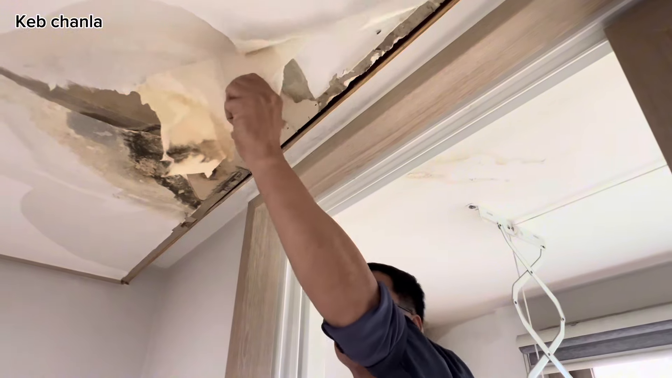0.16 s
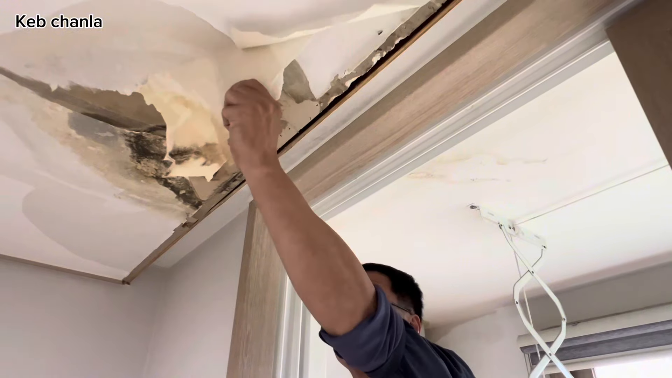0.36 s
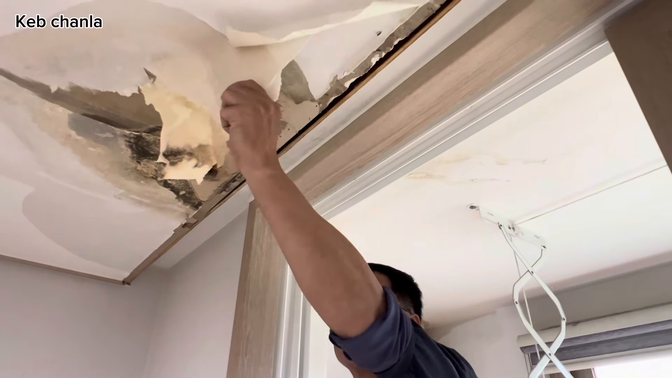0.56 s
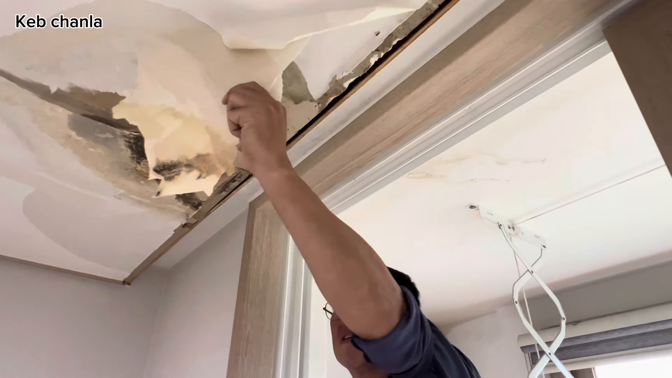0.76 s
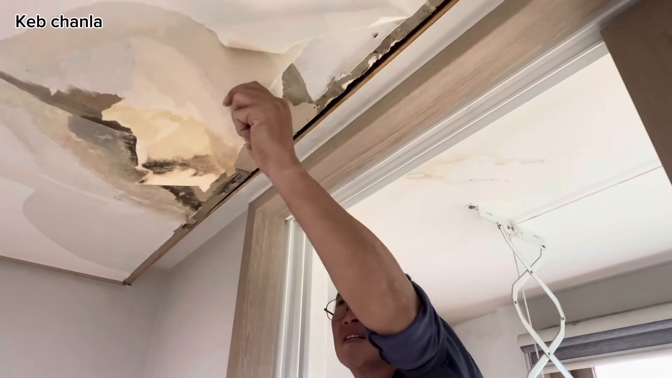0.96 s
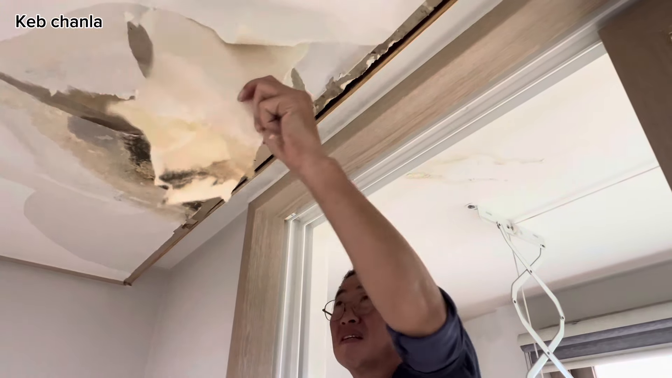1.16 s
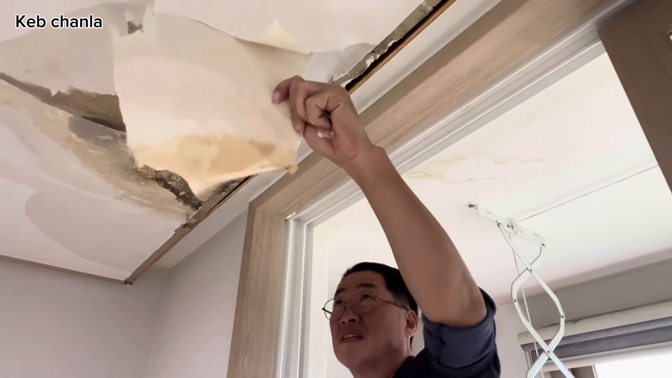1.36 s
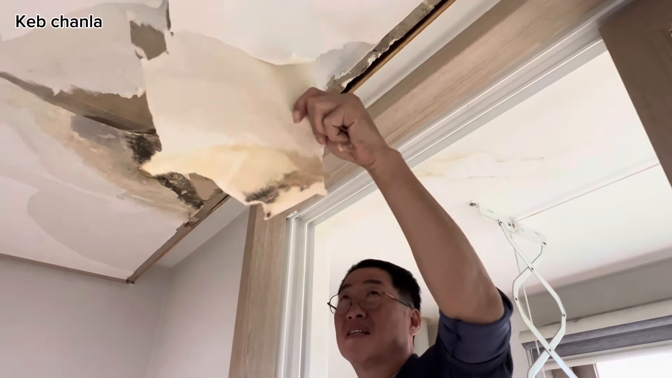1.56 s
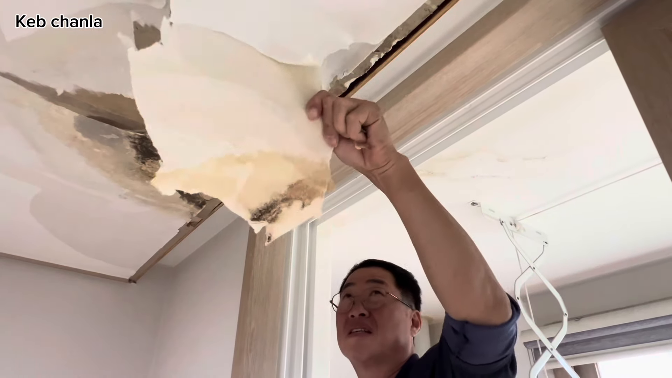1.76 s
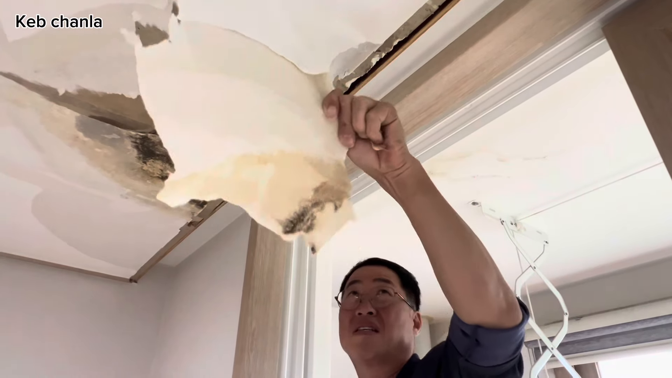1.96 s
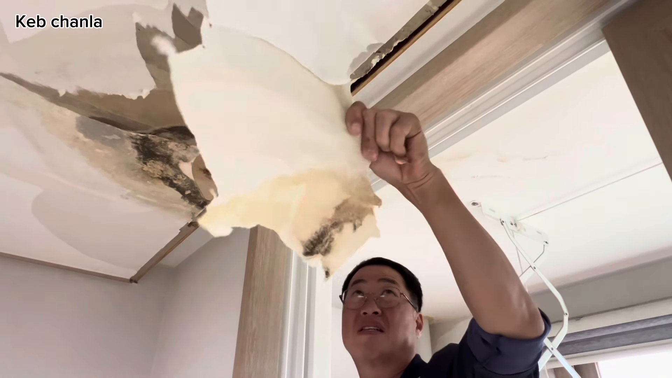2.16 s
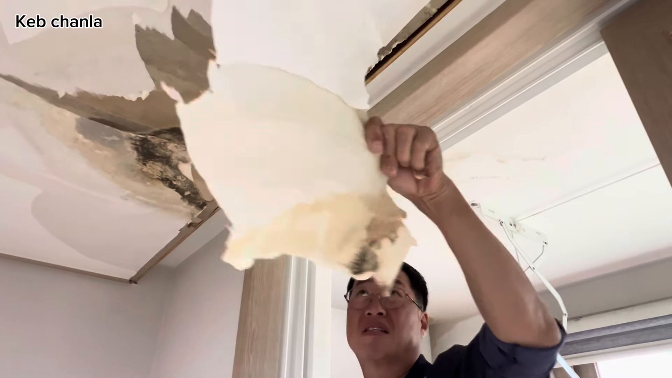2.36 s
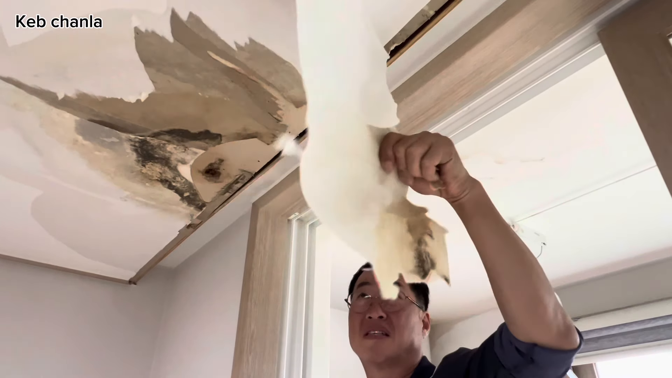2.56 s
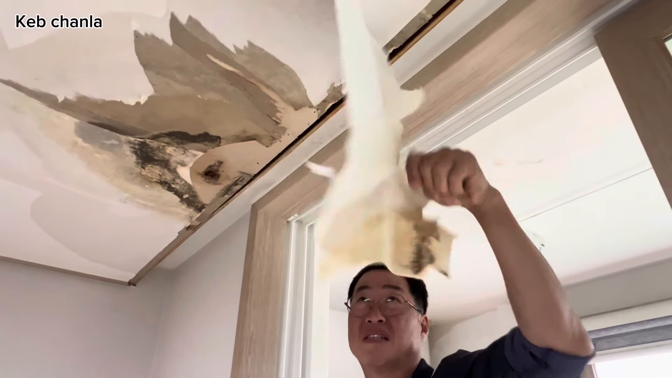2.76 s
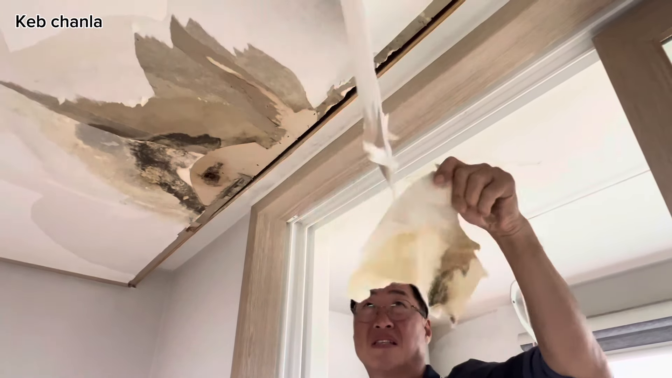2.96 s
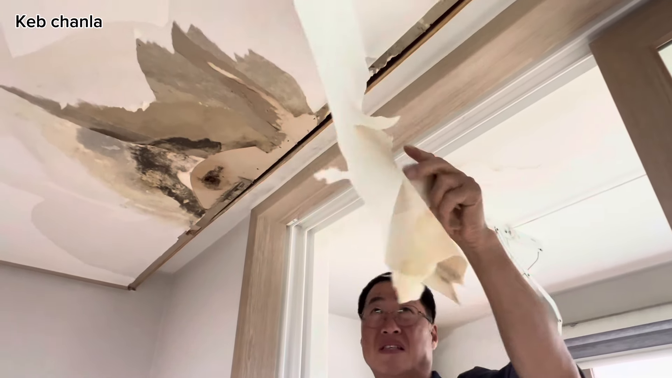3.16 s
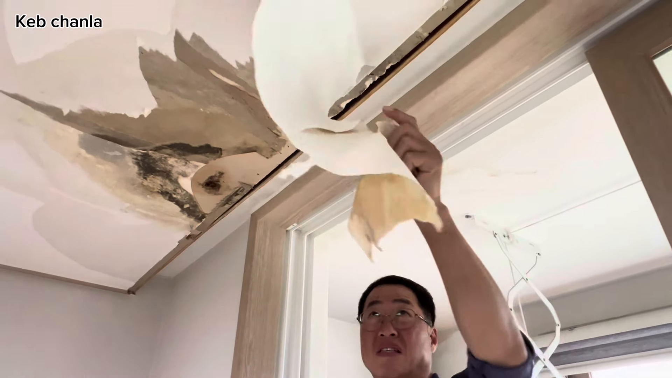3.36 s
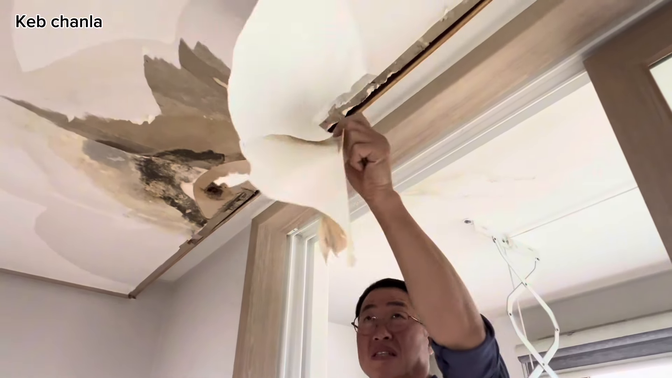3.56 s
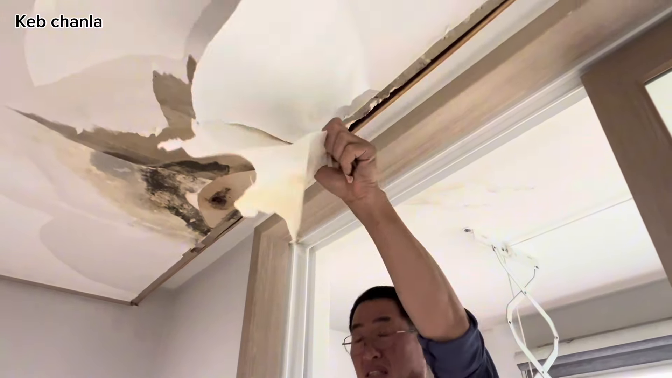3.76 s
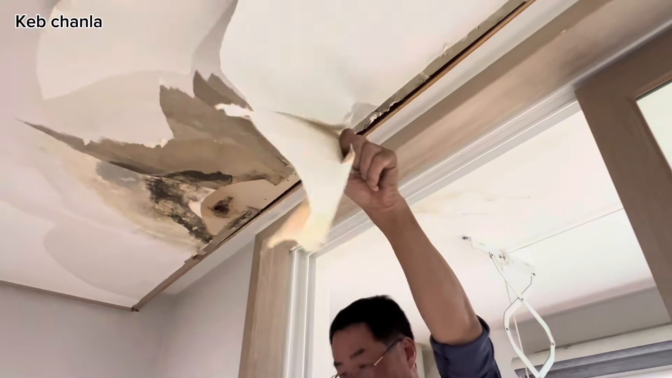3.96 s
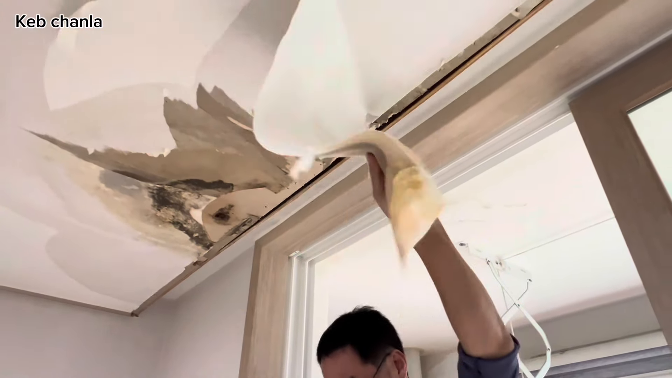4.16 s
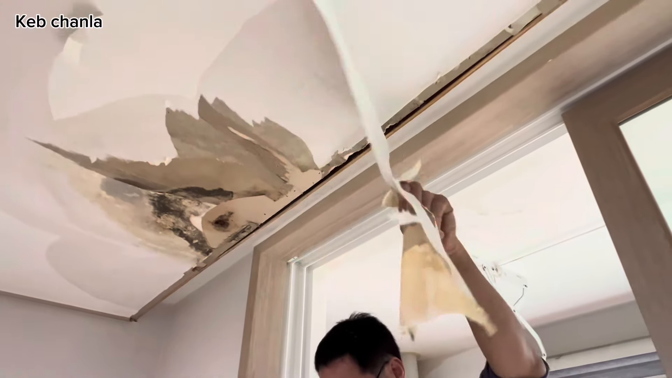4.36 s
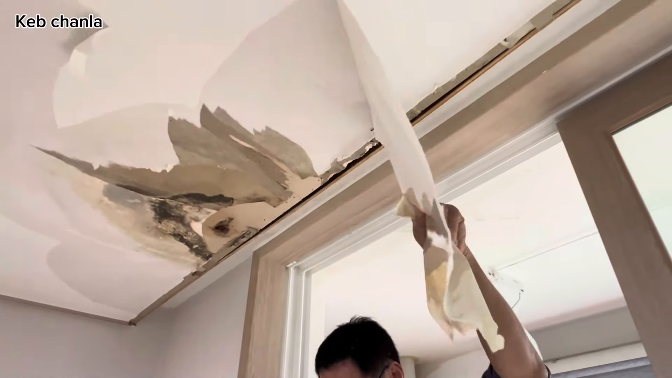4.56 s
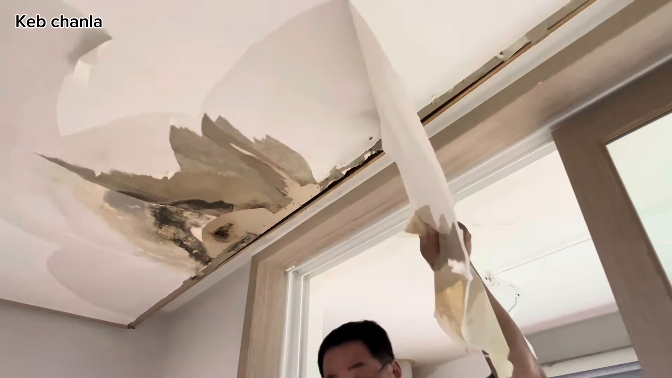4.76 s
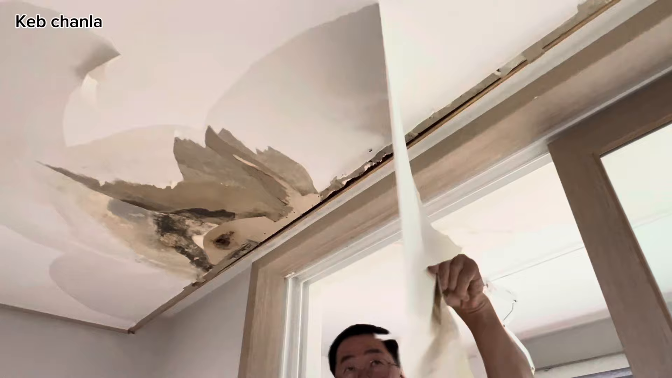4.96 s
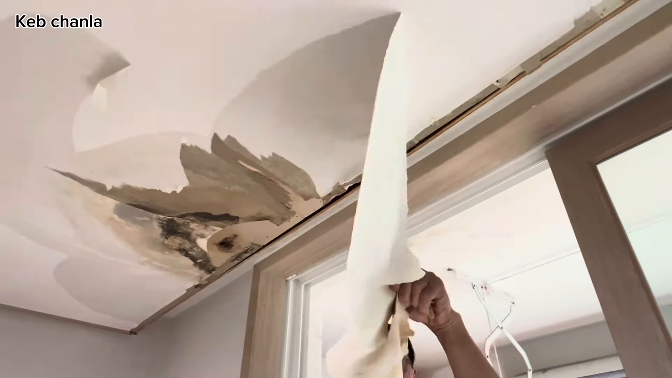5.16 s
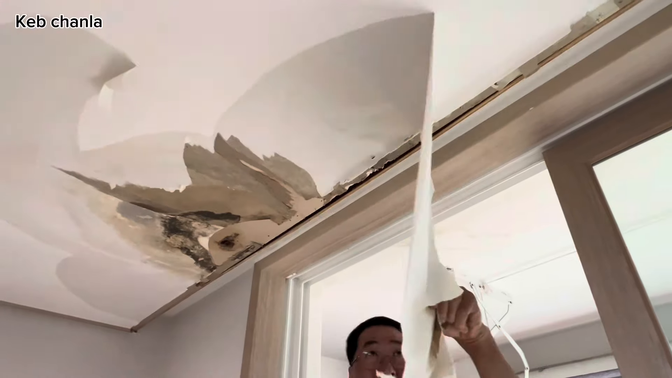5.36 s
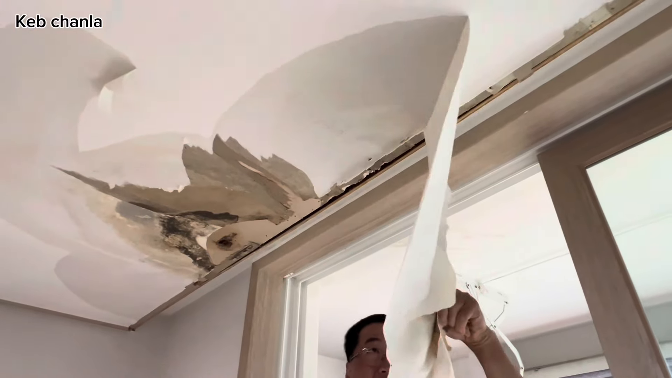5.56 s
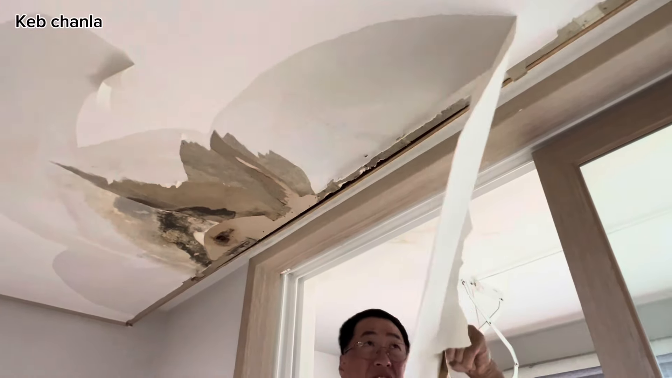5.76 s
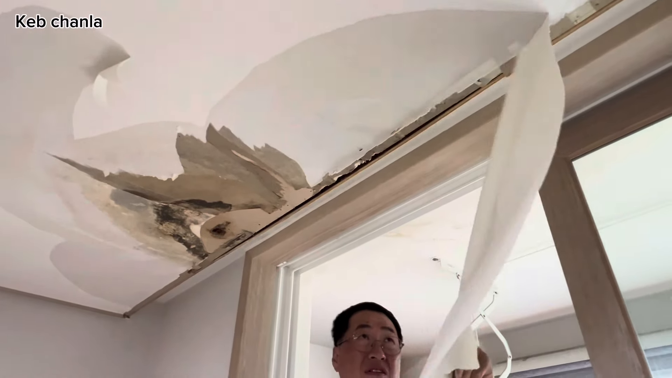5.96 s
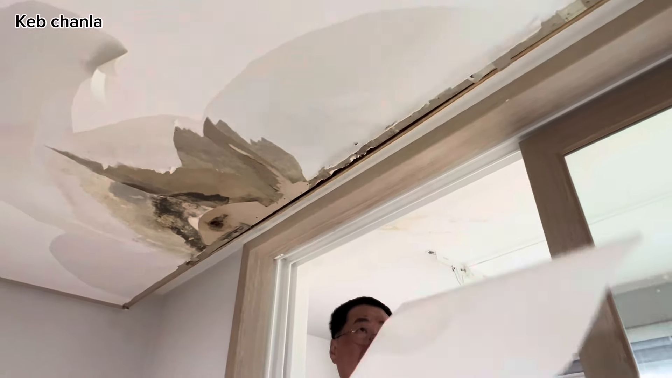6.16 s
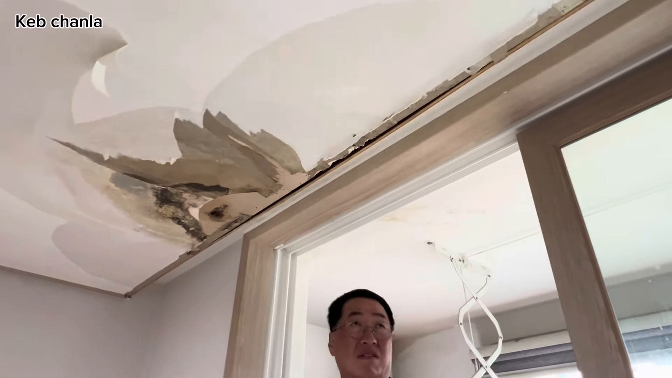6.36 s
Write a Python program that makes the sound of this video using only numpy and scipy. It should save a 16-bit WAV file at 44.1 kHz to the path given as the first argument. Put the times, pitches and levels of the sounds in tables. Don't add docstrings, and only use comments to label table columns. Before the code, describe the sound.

Close stereo pickup in a small bare room with a faint low hush. Wet paper peels overhead in several fibrous, gritty tugs, strongest around one second and between two and three. The loose sheet rattles quietly during a grip change, then a crisp crack begins a continued tearing pull, getting brighter and louder until the sheet comes free, flops with soft clacks, and quiet returns.

```python
import sys
import numpy as np
from scipy import signal
from scipy.fft import rfft, irfft
from scipy.io import wavfile
from scipy.ndimage import uniform_filter1d, map_coordinates

SR = 44100
rng = np.random.default_rng(int(sys.argv[2]) if len(sys.argv) > 2 else 0)


def generate_wav(signal):
    frames = np.transpose(np.atleast_2d(signal))
    scaled = np.clip(frames, -1, 1) * 32767
    pcm = np.round(scaled).astype(np.int16)
    wavfile.write(sys.argv[1], SR, pcm)


def convert_level_to_amplitude(level_db):
    exponent = np.asarray(level_db, float) / 20
    return 10 ** exponent


N = 286385
T = np.arange(N) / SR
HZ = np.fft.rfftfreq(N, 1 / SR)


def evened(x):
    return x / np.sqrt(np.mean(x ** 2) + 1e-20)


def read(points, hz):
    f, value = np.transpose(points)
    return np.interp(np.log(hz + 1), np.log(f + 1), value)


def over_time(points):
    s, *columns = np.transpose(points)
    return [np.interp(T, s, column) for column in columns]


def band(x, lo_hz, hi_hz, colour):
    edges = 1 / (1 + (lo_hz / (HZ + 1)) ** 12) / (1 + (HZ / hi_hz) ** 12)
    gain = convert_level_to_amplitude(read(colour, HZ)) * np.sqrt(edges)
    return evened(irfft(rfft(x) * gain, N))


def resonate(x, hz, width_hz):
    turn = np.exp(2j * np.pi * np.cumsum(hz * np.ones(len(x))) / SR)
    r = np.exp(-np.pi * width_hz / SR)
    smooth = signal.lfilter([1 - r], [1, -r], x / turn + 1e-18)
    return 2 * (turn * smooth).real


def steady(x, seconds):
    power = abs(uniform_filter1d(x ** 2, int(seconds * SR)))
    return x / np.sqrt(power + 0.12)


def lagged(power, seconds):
    r = np.exp(-1 / (SR * max(seconds, 1e-3)))
    return np.sqrt(abs(signal.lfilter([(1 - r) ** 2], [1, -2 * r, r ** 2], power)))


def add(mix, s, sound):
    part = mix[round(s * SR):][:len(sound)]
    part += sound[:len(part)]


# frequency in Hz, level in dB.
HUSH_SPECTRUM = [(18, -31.5), (30, -2), (82, 7.5), (128, -33), (187, -2), (593, -20.5), (978, -10.5),
                 (10600, -36), (12000, -58), (15600, -73), (22000, -120)]


def hush():
    left, right, shared = rng.standard_normal((3, N))
    same = np.clip(160 / (HZ + 1), 0, 1)
    z = rfft(np.array([left, right])) * np.sqrt(1 - same ** 2) + rfft(shared) * same
    swell_db = 0.71 * evened(uniform_filter1d(uniform_filter1d(shared, 3000), 3000))
    return convert_level_to_amplitude(-62.5 + swell_db) * evened(irfft(z * convert_level_to_amplitude(read(HUSH_SPECTRUM, HZ)), N))


# peak in
# s, # rise in s, fall in s, fibre hiss in dB, load on the board in dB against the hiss.
FIRST_RIPS = [(0.06, 0.2, 0.057, -48.5, -2), (0.37, 0.21, 0.018, -40, -9.5),
              (0.456, 0.066, 0.037, -38.5, -12), (0.64, 0.2, 0.16, -37.5, -4.5),
              (0.722, 0.03, 0.29, -46.5, -3.5), (0.982, 0.14, 0.18, -34.5, -4),
              (1.052, 0.07, 0.064, -27, -7.5), (1.177, 0.12, 0.076, -33, 0.5),
              (1.422, 0.085, 0.2, -36, -5.5), (1.523, 0.093, 0.058, -32.0, -4.5),
              (1.764, 0.036, 0.035, -50, -1), (1.984, 0.13, 0.022, -34.5, 1.5),
              (2.048, 0.1, 0.042, -38.5, 2), (2.277, 0.089, 0.141, -30.5, -19),
              (2.316, 0.025, 0.13, -28, -11.0), (2.49, 0.66, 0.069, -34.5, -4),
              (2.594, 0.2, 0.176, -36, -15.5), (2.735, 0.11, 0.038, -30, -2.5)]
HANDLING = [(2.948, 0.062, 0.026, -61.5, 16.5), (3.059, 0.024, 0.11, -55, -15),
            (3.282, .042, 0.084, -58.5, -17), (3.453, 0.027, 0.054, -50.5, -10.5),
            (3.56, 0.024, .03, -72, 10), (3.66, 0.053, 0.09, -57, -10), (3.79, .03, .04, -70, 9.5),
            (3.916, 0.094, 0.033, -56, -4), (4.061, 0.046, 0.0091, -48, -13),
            (4.137, 0.093, 0.031, -51.5, -15), (6.0, 0.025, 0.033, -54, 7.5),
            (6.052, 0.017, 0.016, -50.5, -2), (6.119, .04, 0.048, -64, 10.5), (6.381, .093, 0.071, -73, 8),
            (6.49, 0.035, .04, -72, 0)]
LATER_RIPS = [(4.298, 0.029, 0.046, -38.5, -4.5), (4.42, 0.078, 0.19, -37.5, -6),
              (4.718, 0.063, 0.07, -34.5, -16), (4.76, 0.14, 0.217, -33.5, -1),
              (5.021, 0.079, 0.149, -37, 0.5), (5.19, 0.12, 0.057, -35, -10), (5.304, 0.12, 0.036, -31, -3.5),
              (5.42, 0.088, 0.015, -31.5, -4.5), (5.57, 0.069, 0.022, -28.5, -12),
              (5.67, 0.41, 0.18, -29.5, -6.5), (5.722, 0.083, 0.085, -31.5, -14.5),
              (5.89, 0.037, 0.09, -34.5, -16.5), (5.94, 0.037, 0.0077, -27, -11)]


def tugs():
    tearing, load = np.zeros((2, N))
    for s, rise_s, fall_s, db, load_db in FIRST_RIPS + HANDLING + LATER_RIPS:
        side_s = np.maximum(np.where(T < s, rise_s, fall_s), .01)
        bell = convert_level_to_amplitude(2 * db) * np.exp(-2 * ((T - s) / side_s) ** 2)
        tearing += bell
        load += convert_level_to_amplitude(2 * load_db) * bell
    return tearing, load


def fibres(per_s, spread_db, clump_db, patchy_db):
    clumps = evened(uniform_filter1d(rng.standard_normal(N), 300))
    size_db = spread_db * np.minimum(rng.exponential(1, N), 3.6) + clump_db * clumps
    happens = rng.random(N) < per_s / SR
    drive = convert_level_to_amplitude(size_db) * rng.choice([-1., 1.], N) * happens
    z = signal.stft(drive, nperseg=512, noverlap=384)[2]
    patches = uniform_filter1d(rng.standard_normal(z.shape), 6, 0)
    patches = evened(uniform_filter1d(patches, 22, 1))
    return evened(signal.istft(z * convert_level_to_amplitude(patchy_db * patches), nperseg=512, noverlap=384)[1][:N])


# frequency in Hz, level in dB per Hz.
PAPER = [(18, -39.5), (30, -28.5), (63, 5.5), (97, 4.5), (145, 0.5), (180, -7), (376, -16.5), (445, -20.5),
         (490, -21), (1210, -13), (1400, -16), (4190, -13), (9000, -15), (11700, -57), (19800, -120)]
# frequency in Hz, level in dB per Hz.
AIR = [(9000, -8), (9700, -5), (10400, 0.5), (11200, 1.5), (12000, 4), (13000, -4), (14000, -0.5),
       (16000, 1)]
# time in s, finest fibres in dB against the hiss.
FINENESS = [(0, -4), (.9, -8), (2.2, -8), (2.8, -10.5), (3.3, -4.5), (3.55, -18), (3.95, -25), (4.05, -4),
            (5.3, -5), (5.9, -6), (6.1, -18)]
# time in s, slack in dB against the hiss,
# resonance of the gap behind the front in Hz.
SHEET = [(0, -6, 5230), (.45, -7, 5200), (.95, -7, 4330), (1.07, -4.5, 4300), (1.5, -4, 4370),
         (1.781, 1, 4800), (2.05, -3.5, 4400), (2.5, -12, 4550), (2.74, -3, 3880), (3.06, -8.5, 4300),
         (3.6, 2.5, 3870), (4.1, -2, 3770), (4.45, -12, 4020), (4.75, -12, 3970), (5.051, -5, 4970),
         (5.3, -10, 5300), (5.7, -3, 5830), (6.1, -2, 4700)]
BOARD_LAG_S, FLAP_LAG_S, RATTLE_LAG_S = .03, .015, .0027
FLAP_DB, FLAP_PER_SLACK, RATTLE_DB, BOARD_DB = -3.0, 0.61, -3.5, 1
FLAP_FROM_LOAD = 0.45


def peel():
    tearing, load = tugs()
    slack_db, gap_hz = over_time(SHEET)
    air_db, = over_time(FINENESS)
    drive = fibres(per_s=7000, spread_db=3.83, clump_db=1.52, patchy_db=1.7)

    gap = drive + .5 * resonate(drive, gap_hz, 1700)
    hiss = convert_level_to_amplitude(-3.0) * band(gap, 2200, 9000, PAPER)
    air = convert_level_to_amplitude(air_db) * band(drive, 6270, 14700, AIR)

    flap_power = tearing ** (1 - FLAP_FROM_LOAD) * load ** FLAP_FROM_LOAD
    flap_power = flap_power * convert_level_to_amplitude(2 * (FLAP_DB + FLAP_PER_SLACK * slack_db))
    flap = lagged(flap_power, FLAP_LAG_S) * steady(band(drive, 190, 643, PAPER), 0.085)

    rattle_power = tearing * convert_level_to_amplitude(2 * (RATTLE_DB + slack_db))
    rattle = lagged(rattle_power, RATTLE_LAG_S) * band(drive, 528, 1954, PAPER)

    board = lagged(load, BOARD_LAG_S) * steady(band(drive, 30, 188, PAPER), 0.075)
    return convert_level_to_amplitude(-4.0) * (np.sqrt(tearing) * (hiss + air) + flap + rattle + convert_level_to_amplitude(BOARD_DB) * board)


# start in s, length in s, start in Hz, end in Hz, level in dB.
CREASES = [(0.907, 0.075, 4300, 4260, -40), (1, 0.039, 1090, 1030, -40.5), (1.165, 0.046, 4200, 3920, -36),
           (1.942, 0.047, 1070, 1080, -43), (2.269, 0.15, 4830, 5340, -42),
           (2.696, 0.093, 1530, 1780, -39.5), (4.03, 0.021, 3850, 3950, -57.5),
           (4.671, 0.16, 3630, 3900, -44.5), (5.499, 0.1, 6200, 6030, -47), (5.671, 0.14, 2670, 2530, -42),
           (5.66, 0.11, 387, 373, -41), (5.67, 0.12, 255, 265, -38), (5.82, 0.097, 2650, 2470, -44),
           (5.923, 0.03, 6000, 5630, -36.5)]
CREASE_WIDTH, WIDEN_PER_KHZ = 0.057, .03


def creases():
    out = np.zeros(N)
    for s, length_s, start_hz, end_hz, db in CREASES:
        u = np.linspace(0, 1, int(length_s * SR) + 1)
        hz = start_hz + (end_hz - start_hz) * u
        width_hz = (CREASE_WIDTH + WIDEN_PER_KHZ * start_hz / 1000) * start_hz + 40
        noise = rng.standard_normal(SR // 3)[:len(u)]
        ring = resonate(resonate(noise, hz, width_hz), hz, width_hz)
        ring = evened(steady(evened(ring), .025))
        add(out, s, convert_level_to_amplitude(db) * ring * signal.windows.tukey(len(u), .6))
    return out


# start in s, body in dB, body in Hz, decay in cycles, sharp tick in dB.
SNAPS = [(3.427, -45, 1600, 1.3, -50), (2.693, -26, 900, 1.3, -34), (3.552, -38, 1200, 1.2, -43),
         (3.5525, -41, 8400, 3.5, -44), (3.644, -42, 380, .9, -56), (3.778, -44, 520, 1., -62),
         (3.812, -45, 600, 1., -62), (3.974, -31, 950, 1.6, -58), (3.98, -39, 650, 1.4, -60),
         (3.989, -41, 1100, 1.5, -60), (3.999, -43, 800, 1.5, -62), (4.262, -41, 900, .9, -42),
         (4.3905, -24, 3600, 2.5, -26), (4.398, -27, 6300, 3, -26), (4.39, -25, 6200, 4.5, -19),
         (4.391, -29, 1100, 1.5, -25), (5.831, -26, 1220, 1.3, -30), (6.051, -28, 900, 1.3, -44),
         (6.051, -29, 3600, 1.4, -46), (6.053, -29, 1600, 1.8, -50), (6.058, -36, 2300, 1.5, -52),
         (6.069, -31, 1100, 1.3, -50), (6.288, -50, 420, 1.1, -72)]


def snaps():
    out, t = np.zeros(N), np.arange(600) / SR
    for s, db, hz, cycles, tick_db in SNAPS:
        swing = np.sin(2 * np.pi * hz * t) * np.tanh(t * hz * 4.2)
        body = convert_level_to_amplitude(db) * swing * np.exp(-t * hz / max(cycles, .3))
        tick = convert_level_to_amplitude(tick_db) * rng.standard_normal(len(t)) * np.exp(-t / .0004)
        add(out, s, body + tick)
    return out


# frequency in Hz, t60 in s.
WALLS = [(80, 0.21), (300, 0.21), (1500, 0.29), (5000, 0.17), (12000, 0.12)]
# frequency in Hz, level in dB.
WET = [(60, -21.5), (200, -8.5), (600, -1.5), (2500, 0.5), (7000, -1), (9500, -6), (15000, -8)]
# delay in s, level in dB.
ECHOES = [(.0022, -7.5), (.0085, -3), (0.015, -25), (.027, -3)]


def tail():
    taps = np.zeros((2, SR // 2))
    at = np.arange(300, SR // 2 - 20, 20) + rng.integers(0, 20, (2, (SR // 2 - 301) // 20))
    np.put_along_axis(taps, at, rng.choice([-1., 1.], at.shape), 1)
    hz, t, z = signal.stft(taps, SR, nperseg=512)
    z = z * convert_level_to_amplitude(-60 * t / read(WALLS, hz)[:, None])
    z = z / np.sqrt((abs(z) ** 2).sum(2, keepdims=True)) * convert_level_to_amplitude(read(WET, hz))[:, None]
    taps = signal.istft(z, SR, nperseg=512)[1]
    taps = convert_level_to_amplitude(-0.5) * taps / np.linalg.norm(taps[0])
    for s, db in ECHOES:
        at = round(s * SR * rng.uniform(.9, 1.1)) + rng.integers(-9, 10, 2)
        taps[[0, 1], at] += convert_level_to_amplitude(db - 4.5)
    return taps


def room(x, count=10, step_s=.06):
    wet = np.zeros((2, N))
    for k in range(count):
        turn = (T / step_s - k + count / 2) % count - count / 2
        share = np.cos(np.pi / 2 * np.clip(turn, -1, 1))
        wet += signal.fftconvolve((x * share)[None], tail(), axes=1)[:, :N]
    return wet


# time in s, delay of the left port in samples.
FRONT = [(0, -1), (1.2, -10), (2.2, -4), (2.7, -1.5), (3.7, -2), (5.2, 0), (5.7, 16), (6.49, -2.5)]


def scene():
    paper, strands = peel() + creases(), snaps()
    lag = over_time(FRONT)[0] / 2
    direct = np.array([map_coordinates(paper, [np.arange(N) - side * lag], order=3) for side in (1, -1)])
    return direct + strands + room(paper + convert_level_to_amplitude(-5.5) * strands)


# frequency in Hz, left minus right in dB.
PORT_DB = [(60, 0.5), (130, 2), (290, 5), (640, 1.5), (1410, 2), (3100, -2), (6820, 5.5), (15000, -37)]
# frequency in Hz, share from 0 to 1.
OWN = [(7600, .99), (8800, .85), (9600, .32), (10300, .17), (12000, .05), (13800, .15), (15500, .05)]
PORT_DELAY_S, EDGE_HZ = 1 / 3440, 15760


def ports(dry):
    z, tilt = rfft(dry), convert_level_to_amplitude(read(PORT_DB, HZ) / 2)
    own = np.clip(read(OWN, HZ), 0, 1)
    top = z[0] * np.array([np.ones(len(HZ)), -np.exp(-2j * np.pi * HZ * PORT_DELAY_S)])
    return irfft(own * z * np.array([tilt, 1 / tilt]) + (1 - own) * top, N)


def low_pass(x):
    return signal.sosfilt(signal.butter(12, 16800, fs=SR, output="sos"), x)


def record(dry):
    edge = 1 + np.minimum(HZ / EDGE_HZ, 1.1) ** 600
    mix = irfft(rfft(ports(dry) + hush()) / edge, N)
    return low_pass(mix)


dry = scene()
out = record(dry)
generate_wav(out)
```